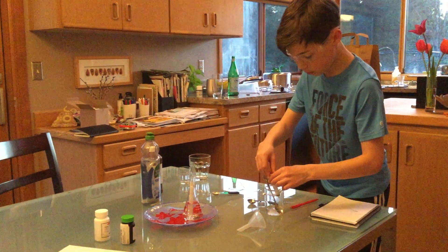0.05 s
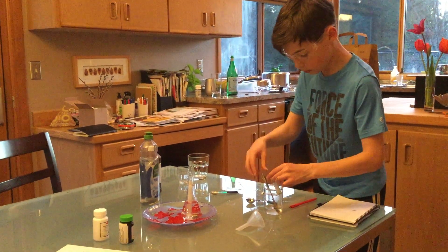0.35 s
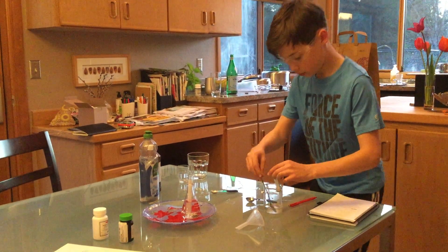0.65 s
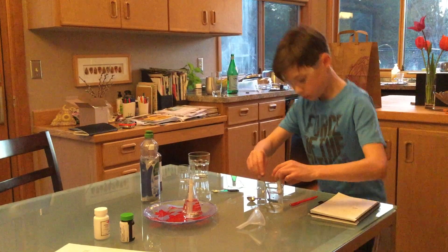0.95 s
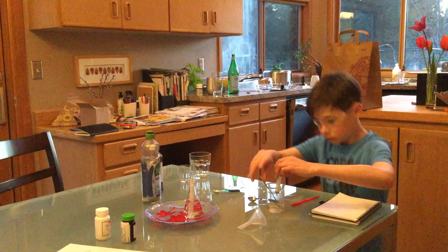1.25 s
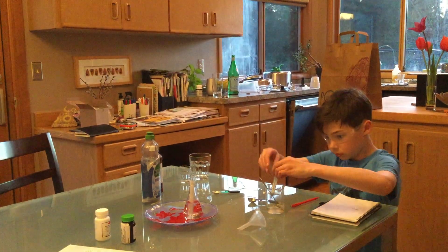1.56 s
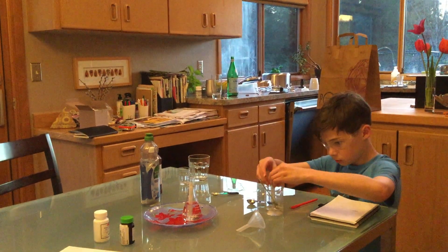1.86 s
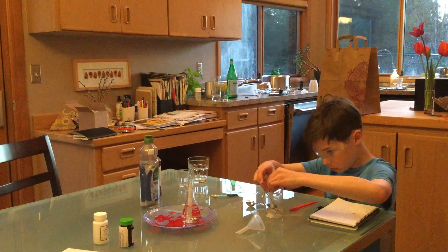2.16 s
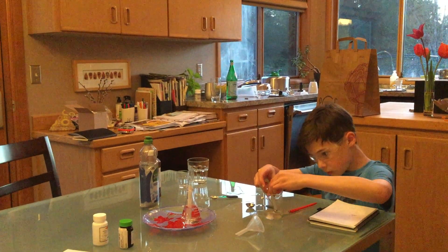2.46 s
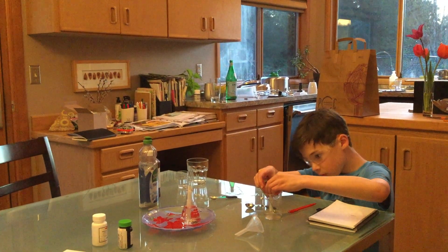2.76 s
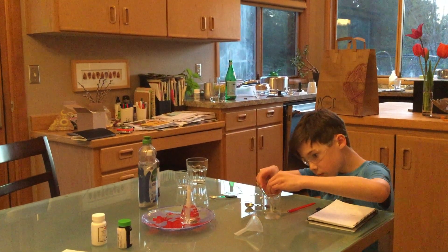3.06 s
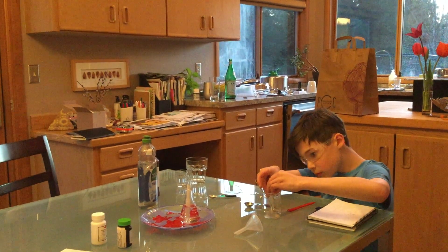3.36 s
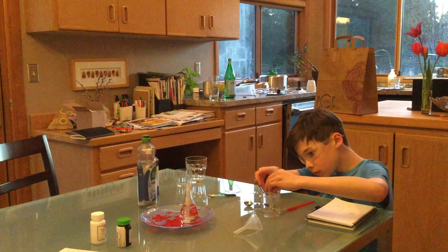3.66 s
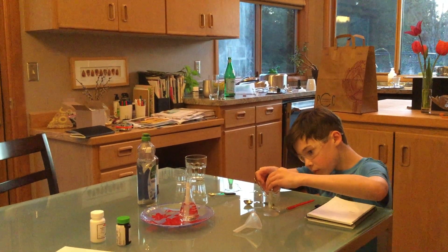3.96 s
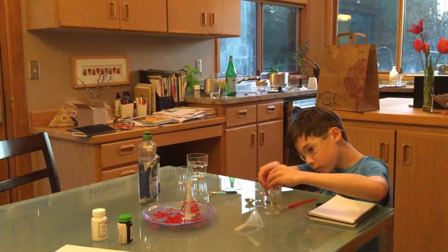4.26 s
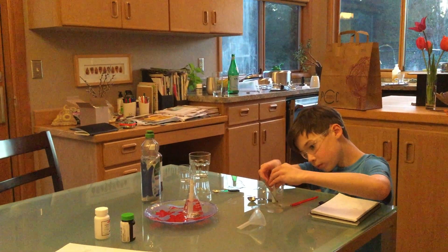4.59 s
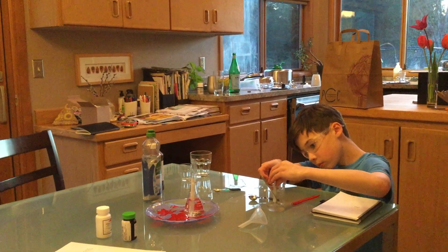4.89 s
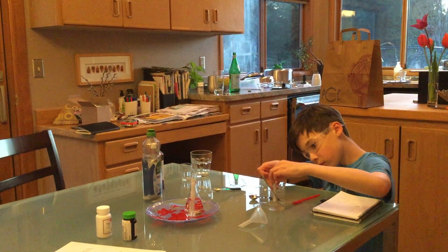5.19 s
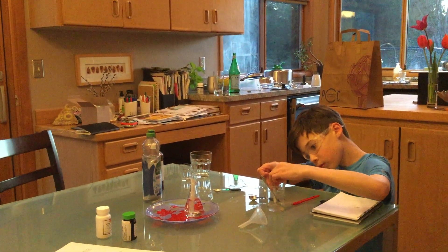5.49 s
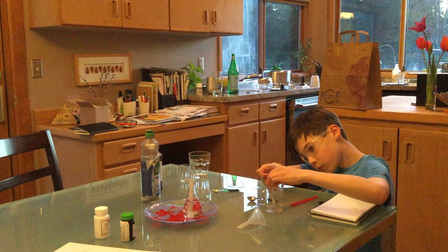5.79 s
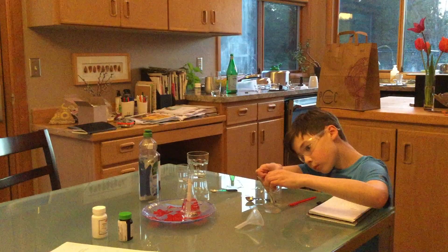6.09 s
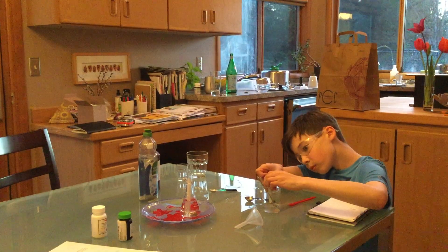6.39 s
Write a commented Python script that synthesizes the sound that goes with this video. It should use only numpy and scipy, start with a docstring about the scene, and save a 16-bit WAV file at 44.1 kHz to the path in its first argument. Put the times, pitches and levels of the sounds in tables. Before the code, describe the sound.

In a quiet kitchen with a low ventilation rumble, someone handles a spoon and a small glass on a glass tabletop, a couple of metres from one microphone. Light taps build to a cluster of bright clinks, their ring quickly damped by fingers. Dull bumps and a swish of clothing follow as the person sits. The touches then grow sparse, the spoon rattles once in the glass, and faint ticks close the scene.

```python
"""A spoon clinks on a small glass, handled on a glass tabletop a couple of metres from one microphone.
Each touch clicks, knocks the tabletop and rings the spoon and the glass, until the fingers damp the
glass; once the spoon rattles. The handler sits down with a few dull bumps and a rustle of clothes.
The kitchen rings around it all, over a low ventilation rumble."""
import sys
import numpy as np
from scipy import signal
from scipy.fft import rfft, irfft
from scipy.io import wavfile
from scipy.ndimage import uniform_filter1d

SR = 44100
rng = np.random.default_rng(int(sys.argv[2]) if len(sys.argv) > 2 else 0)


def pcm_store(signal):
    """Save signal as 16-bit PCM."""
    levels = np.round(np.clip(np.atleast_2d(signal), -1, 1) * 32767)
    wavfile.write(sys.argv[1], SR, levels.astype(np.int16).T)


N = 292632
TIME = np.arange(N) / SR
RING = np.arange(int(.8 * SR)) / SR  # seconds since a blow
MIDDLING_DB = -53.5  # a clink of middling force
HELD_S = .009  # a glass held in the fingers rings freely only this long


def undb(db):
    """Decibels to gain."""
    return 10 ** (np.asarray(db) / 20)


def unit(x):
    """Scale to rms 1."""
    return x / np.sqrt(np.mean(x ** 2))


def on_log_axis(hz, points):
    """Read (f/Hz, value) points at the given frequencies."""
    f, value = np.transpose(points)
    return np.interp(np.log(np.maximum(hz, 1)), np.log(f), value)


def noise(colour, size):
    """Noise of rms 1, coloured by (f/Hz, level/dB) points."""
    gain = undb(on_log_axis(np.fft.rfftfreq(size, 1 / SR), colour))
    return unit(irfft(rfft(rng.standard_normal(size)) * gain, size))


def wander(size):
    """A smooth random drift of rms 1 that changes over about size samples."""
    return unit(uniform_filter1d(uniform_filter1d(rng.standard_normal(N), size), size))


def fade(t60):
    """Exponential decay, 60 dB in t60 seconds."""
    return np.exp(-np.log(1000) * RING / t60)


def add(track, s, sound):
    """Mix a sound into the track at s seconds."""
    start = int(s * SR)
    track[start:start + len(sound)] += sound[:N - start]


def ring(modes, scatter_db):
    """Decaying modes; each blow lands elsewhere and so weights them anew."""
    chance = rng.standard_normal((len(modes), 2))
    return sum(np.sign(side) * undb(db + scatter_db * spot) * np.sin(2 * np.pi * hz * RING) * fade(t60)
               for (hz, db, t60), (spot, side) in zip(modes, chance))


# colour of the ventilation and still air: f/Hz, relative level/dB
AIR_COLOUR = [(20, -24.5), (40, -10.5), (60, 4.5), (90, -3.5), (130, -3), (180, -2.5), (230, -4),
              (310, -3.5), (400, -14), (520, -21.5), (1000, -22), (2000, -34.5), (5000, -36.5),
              (16000, -43.5)]
# appliance tones: f/Hz, level/dB
HUM_LINES = [(59.5, -70.5), (226, -73.5), (296, -78), (9001, -100)]
def room_tone():
    """Gently wavering ventilation rumble with the faint hum of kitchen appliances."""
    hum = sum(np.sqrt(2) * undb(db) * np.sin(2 * np.pi * (hz * TIME + rng.random()))
              for hz, db in HUM_LINES)
    rumble = undb(-62.5 + 0.99 * wander(size=5000)) * noise(AIR_COLOUR, N)
    return rumble + hum


# reverberation of the kitchen: f/Hz, t60/s
KITCHEN_DECAY = [(100, 0.54), (500, 0.6), (1500, 0.7), (3000, 0.75), (5000, 0.57), (8000, .43),
                 (12000, 0.33), (16000, 0.19)]
def kitchen(early_t60=.07, build_s=0.0017):
    """First reflections off table and cupboards, and a tail whose treble dies first; both of energy 1."""
    white = rfft(rng.standard_normal(len(RING)))
    hz = np.fft.rfftfreq(len(RING), 1 / SR)
    centres, t60s = np.transpose(KITCHEN_DECAY)
    bands = [on_log_axis(hz, list(zip(centres, weights))) for weights in np.eye(len(centres))]
    tail = sum(irfft(white * band, len(RING)) * fade(t60) for band, t60 in zip(bands, t60s))
    tail *= 1 - np.exp(-RING / build_s)
    sparse = rng.standard_normal(len(RING)) ** 3
    early = sparse * fade(early_t60)
    return early / np.linalg.norm(early), tail / np.linalg.norm(tail)


def at_mic(sound, room, db, early_db, tail_db):
    """A blow from across the kitchen: direct sound, reflections and tail, set to db over the first 30 ms."""
    early, tail = room
    response = (RING == 0) + undb(early_db) * early + undb(tail_db) * tail
    wet = signal.fftconvolve(sound, response)[:len(RING)]
    return wet * undb(db) / np.sqrt(np.mean(wet[:round(.03 * SR)] ** 2))


# colour of sliding cloth: f/Hz, relative level/dB
CLOTH_COLOUR = [(300, -9.5), (900, 13.5), (2500, 11.5), (5000, -6.5), (8000, -15.5), (13000, -12),
                (16000, -12)]
# swishes as the handler leans and sits: peak t/s, level/dB, rise/s, fall/s
CLOTH_SWISHES = [(.87, -71.5, 0.042, 0.33), (1.58, -58.5, 0.12, 0.36)]
def clothes(fidget_db=-91.5):
    """Cloth slides unevenly with the arms; each swish swells quickly and dies away more slowly."""
    swell = sum(undb(db) * np.exp(-((TIME - s) / np.where(TIME < s, rise_s, fall_s)) ** 2)
                for s, db, rise_s, fall_s in CLOTH_SWISHES)
    return noise(CLOTH_COLOUR, N) * (swell + undb(fidget_db)) * undb(2.0 * wander(size=900))


# modes of the table frame: f/Hz, relative level/dB, t60/s
FRAME_MODES = [(58, -8.5, 0.056), (78.5, -3, .15), (101.9, -1, 0.16), (127.6, 0, 0.098),
               (141.7, -7.5, 0.26), (186.4, -1.5, 0.17), (233.6, -8, 0.13), (306.8, -11.5, 0.15),
               (356, -15.5, .08)]
# body and chair against the table: t/s, level/dB
TABLE_BUMPS = [(0.724, -55), (1.107, -47.5), (1.125, -45.5), (1.172, -53), (1.463, -34), (1.489, -38.5),
               (1.518, -40.5), (1.566, -43), (1.622, -48), (1.724, -54), (5.955, -56.5)]
def bumps(swell_s=0.0082):
    """Soft blows swell slowly and move only the low modes of the table frame."""
    out = np.zeros(N)
    push = 1 - np.exp(-(RING / swell_s) ** 2)
    for s, db in TABLE_BUMPS:
        thud = ring(FRAME_MODES, scatter_db=4.0) * push
        add(out, s, at_mic(thud, kitchen(), db, early_db=-9.5, tail_db=-5.5))
    return out


# modes of the tabletop with what stands on it: f/Hz, relative level/dB, t60/s
TABLETOP_MODES = [(713, -3.5, 0.059), (834, -11, 0.02), (1045, 3.5, 0.041), (1122.5, -11, 0.36),
                  (1218, -1, 0.064), (1355.4, 3, 0.031), (1650, -20.5, .04), (1528, -4, 0.094),
                  (1645, -7.5, .18), (1693, -8, 0.21), (2152, -3.5, 0.14), (2180, -18.5, .1),
                  (2552, -7.5, 0.25)]
def tabletop(room, level_db, centre_hz, db_per_octave=21):
    """The tabletop faces the microphone; a knock's spot and softness favour the modes near one pitch."""
    modes = [(hz, db - db_per_octave * abs(np.log2(hz / centre_hz)), t60)
             for hz, db, t60 in TABLETOP_MODES]
    return at_mic(ring(modes, scatter_db=-1.5), room, level_db, early_db=0.0, tail_db=-1.0)


# colours of the contact click and of its sharp edge: f/Hz, relative level/dB
CLICK_COLOUR = [(250, -29.5), (480, -17.5), (700, 8.5), (1000, 2.5), (1900, 4.5), (2450, 6), (2800, -3.5),
                (3350, -2), (4050, -9.5), (5200, -14), (5900, -10), (6500, -22.5), (9000, -30),
                (16000, -39.5)]
EDGE_COLOUR = [(2000, -23), (4500, 6.5), (5900, -6.5), (6500, -9.5), (7400, 8), (8400, 5), (9400, -10.5),
               (10050, 1.5), (11000, -7.5), (11800, 3), (12700, 3), (14000, -5.5), (15500, -2)]
def contact(room, click_db, high_ring_db):
    """A short click with a sharper edge whose level follows the high ring of the glass."""
    edge_db = MIDDLING_DB + 1 + 0.98 * (high_ring_db - MIDDLING_DB)
    click = noise(CLICK_COLOUR, len(RING)) * fade(t60=0.045)
    edge = noise(EDGE_COLOUR, len(RING)) * fade(t60=.018)
    return (at_mic(click, room, click_db, early_db=5.0, tail_db=10.0)
            + at_mic(edge, room, edge_db, early_db=0.0, tail_db=3.0))


# modes of the spoon, damped by the hand: f/Hz, relative level/dB, t60/s
SPOON_MODES = [(2286, 2, 0.052), (2490, 4, 0.075), (2725, 2, 0.054), (2840, 1, .09), (3010, 0, 0.078),
               (3170, -0.5, 0.049), (3210, 1.5, .06), (3251, 1.5, 0.054), (3470, 2, .07),
               (3580, -8.5, 0.098), (3710, -1, 0.099), (4050, -10, 0.023), (5380, -12.5, .04),
               (5720, -6, 0.031), (6200, -9.5, 0.017)]
def spoon(room, db):
    """Half hidden by the hands, the spoon's ring reaches the microphone mostly by way of the room."""
    return at_mic(ring(SPOON_MODES, scatter_db=2.0), room, db, early_db=4.5, tail_db=3.0)


# modes of the small glass: f/Hz, relative level/dB, t60/s
GLASS_MODES = [(4601, 0, .24), (4619, -3, .1), (4530, -6, .07), (4675, -10, .05), (7373, -1, .1),
               (7424, 1, .16), (7488, -6, .06), (5701, -23, .05), (6002, -18, .11), (8140, -8, .05),
               (8265, -6, .06), (8315, -10, .08), (9092, -17, .07), (9991, -9, .1), (12350, -12, .04),
               (12640, -13, .04)]
def glass(room, low_db, high_db, free_s, split_hz=6500, damp_s=0.0044):
    """The low and high modes of the glass ring freely until the fingers press on it again."""
    grip = np.exp(-np.maximum(RING - free_s, 0) / damp_s)
    low = grip * ring([mode for mode in GLASS_MODES if mode[0] < split_hz], scatter_db=2)
    high = grip * ring([mode for mode in GLASS_MODES if mode[0] >= split_hz], scatter_db=2)
    return (at_mic(low, room, low_db, early_db=1.0, tail_db=0.0)
            + at_mic(high, room, high_db, early_db=-1.0, tail_db=-5.5))


def touch(table_db, table_hz, glass_db, click_db, spoon_db, bright_db, free_s=HELD_S):
    """One touch sounds tabletop, spoon, click and glass; bright_db shifts the high ring against the low."""
    room = kitchen()
    high_db = glass_db + bright_db
    graze = 1 - np.exp(-RING / 0.00078)  # it grazes before it bites, so the sound takes a moment to build
    return graze * (tabletop(room, table_db, table_hz) + spoon(room, spoon_db)
                    + contact(room, click_db, high_db) + glass(room, glass_db, high_db, free_s))


# light ticks of the spoon: t/s, spoon level/dB, glass level/dB
SPOON_TICKS = [(3.139, -78.5, -84.5), (3.228, -75, -83), (3.382, -65, -78), (3.494, -68, -75.5),
               (5.545, -80.5, -90), (5.913, -62.5, -63.5), (5.998, -72.5, -80)]
def ticks():
    """Light touches that sound mostly the spoon and barely wake the glass."""
    out = np.zeros(N)
    for s, db, glass_db in SPOON_TICKS:
        add(out, s, touch(table_db=db - 8.5, table_hz=1200, glass_db=glass_db,
                          click_db=db - 4.5, spoon_db=db, bright_db=-3))
    return out


# the foot of the glass on the tabletop: t/s, tabletop level/dB, centre f/Hz, glass level/dB
FOOT_KNOCKS = [(0.466, -62, 1290, -82), (.667, -63, 1520, -76.5), (.935, -54, 1560, -68),
               (2.187, -47.5, 1260, -66.5), (3.104, -65, 1300, -91.5), (3.319, -72, 1240, -97),
               (4.467, -66, 1200, -94.5), (5.118, -65, 1253, -90.5), (5.285, -67, 1150, -102),
               (6.349, -78, 1000, -99)]
def knocks():
    """Glass on tabletop: mostly the tabletop sounds, since the glass is held."""
    out = np.zeros(N)
    for s, db, hz, glass_db in FOOT_KNOCKS:
        add(out, s, touch(db, hz, glass_db, click_db=db - 14.5, spoon_db=db - 17, bright_db=0))
    return out


# the spoon strikes the glass, which passes the blow to the tabletop:
# t/s, tabletop level/dB, tabletop centre f/Hz, glass level/dB, brightness/dB, free ring/s
SPOON_CLINKS = [ (.494, -57, 1400, -71.5, -4.5, 0.0066), (.746, -55, 1350, -51.5, -2.5, 0.0028),
                (1.062, -43.5, 1430, -46.5, 3.5, 0.0033), (1.084, -51, 1400, -54, -2, .01),
                (1.147, -38.5, 1480, -41.5, 6.5, .12), (1.174, -42, 1650, -52.5, 0.5, .02),
                (1.285, -51.5, 1620, -61.5, 5.5, 0.027), (1.648, -53, 1330, -52.5, -6, 0.16),
                (1.78, -53, 1450, -50.5, -4, 0.0084), (2.260, -53.5, 1420, -51, -1, 0.064),
                (2.676, -55.5, 1740, -61, -7, 0.0074), (4.075, -61, 1290, -65, -5, 0.18),
                (4.683, -46, 1540, -42.5, -2.5, 0.068), (4.707, -43.5, 1670, -41, -5.5, 0.095),
                (4.732, -62, 1700, -44.5, -6.5, .035), (4.754, -54, 1660, -50, -12, 0.023)]
def clinks():
    """Spoon on glass: the harder the blow, the more the spoon's ring gains on the click."""
    out = np.zeros(N)
    for s, table_db, table_hz, glass_db, bright_db, free_s in SPOON_CLINKS:
        force_db = (table_db + glass_db) / 2 - MIDDLING_DB
        click_db = -55.5 + 0.58 * force_db
        spoon_db = -62 + 1.5 * force_db
        add(out, s, touch(table_db, table_hz, glass_db, click_db, spoon_db, bright_db, free_s))
    return out


def scene():
    """The kitchen in mono, a couple of metres from the table."""
    return (room_tone() + clothes() + bumps() + clinks() + knocks() + ticks())[None]


def record(dry, bass_hz=40, top_hz=15650):
    """The microphone thins the deep bass and the recorder cuts the top."""
    thin = signal.sosfilt(signal.butter(2, bass_hz, "high", fs=SR, output="sos"), dry)
    return signal.sosfilt(signal.ellip(10, .2, 80, top_hz, fs=SR, output="sos"), thin)


dry = scene()
out = record(dry)
pcm_store(out)
```